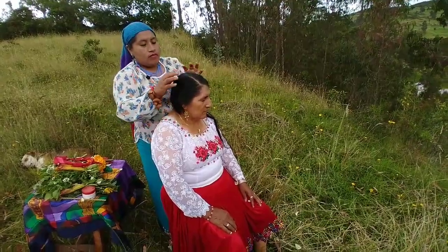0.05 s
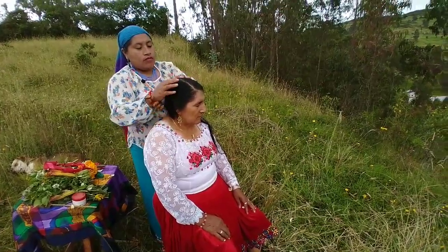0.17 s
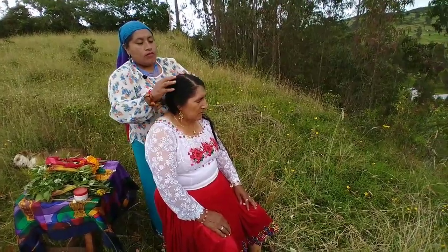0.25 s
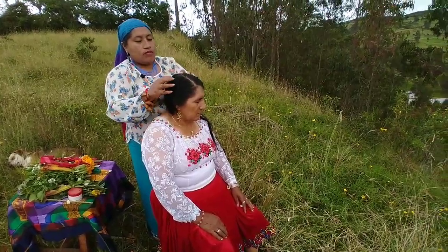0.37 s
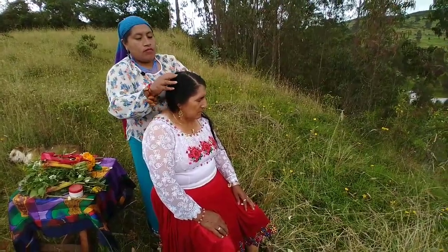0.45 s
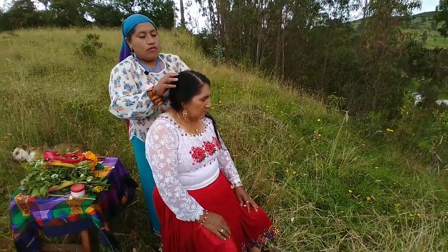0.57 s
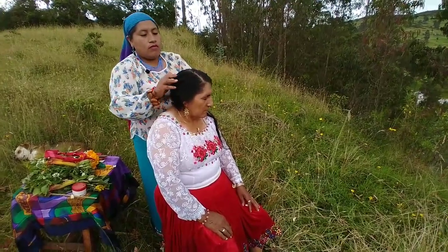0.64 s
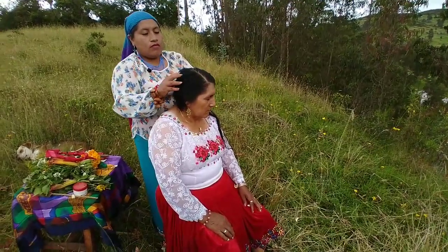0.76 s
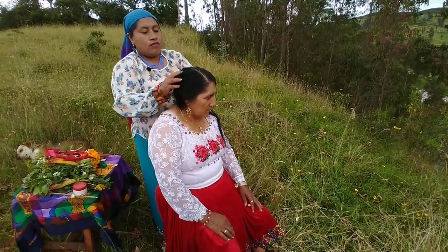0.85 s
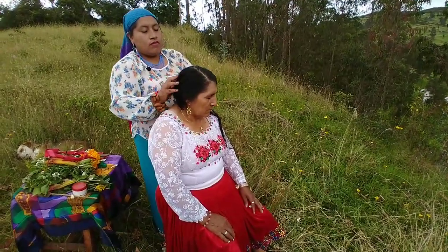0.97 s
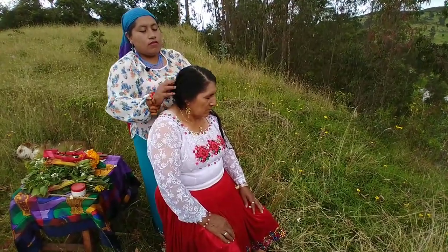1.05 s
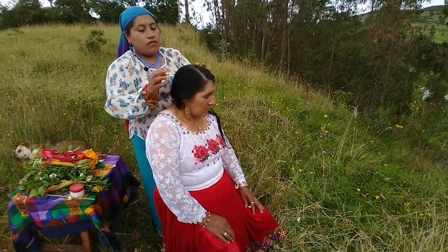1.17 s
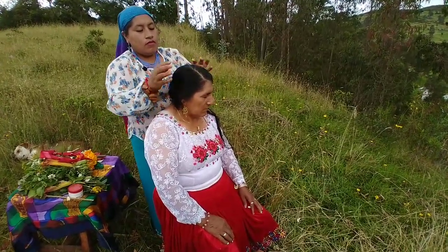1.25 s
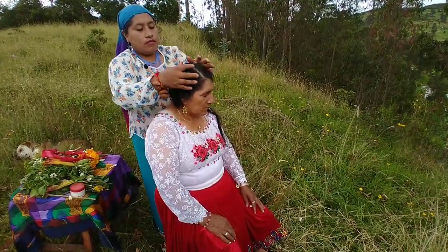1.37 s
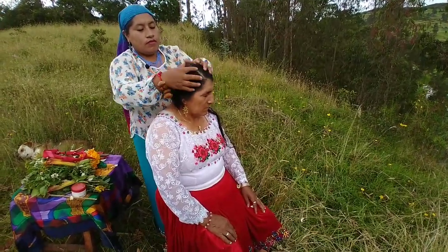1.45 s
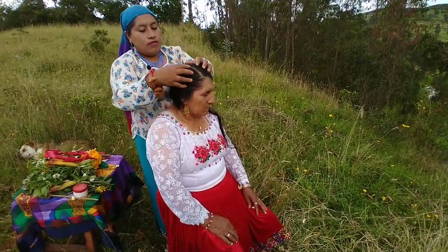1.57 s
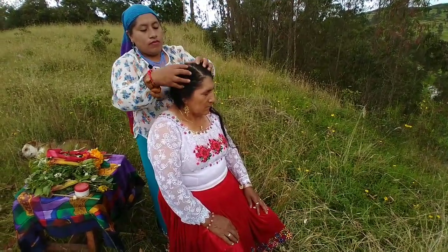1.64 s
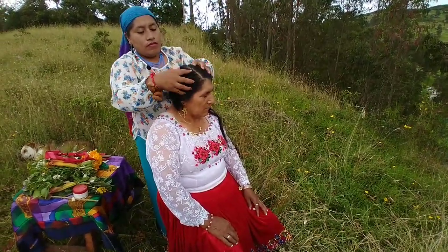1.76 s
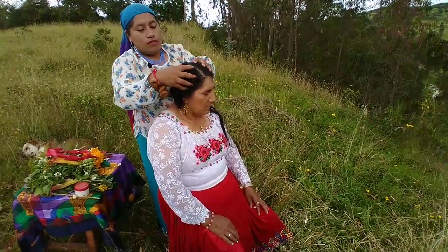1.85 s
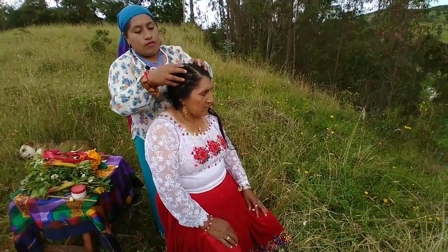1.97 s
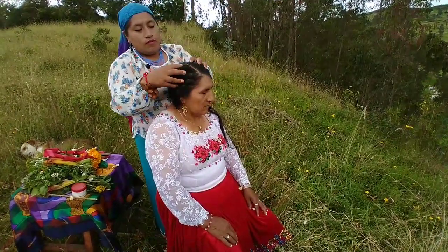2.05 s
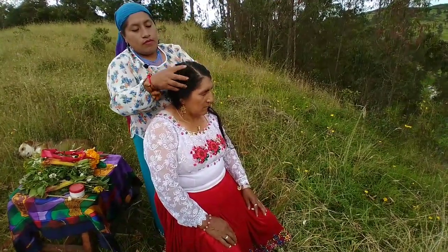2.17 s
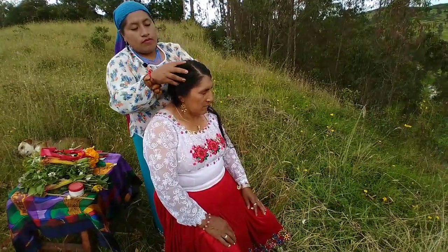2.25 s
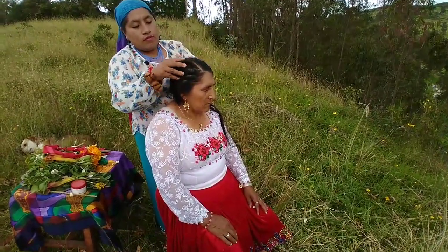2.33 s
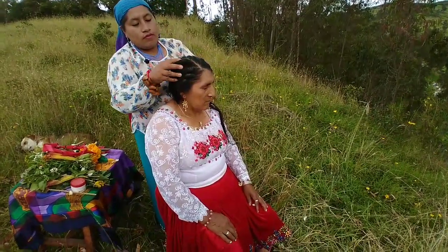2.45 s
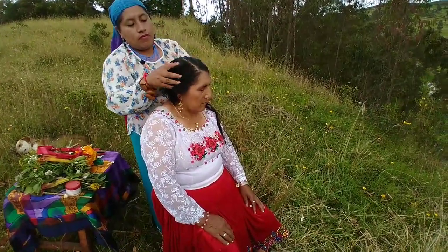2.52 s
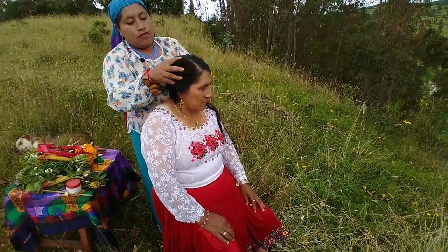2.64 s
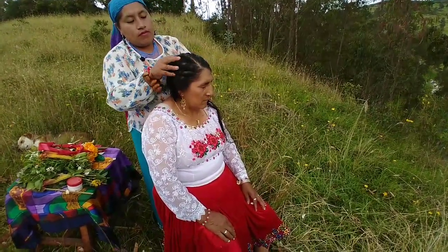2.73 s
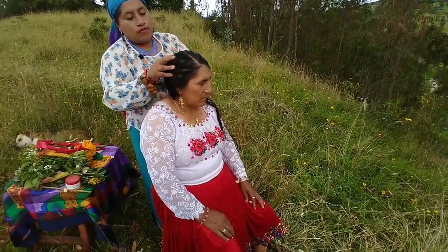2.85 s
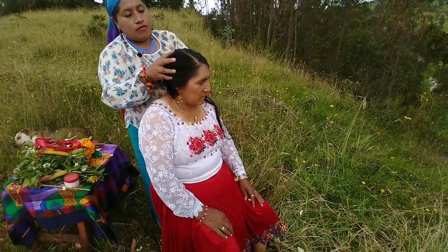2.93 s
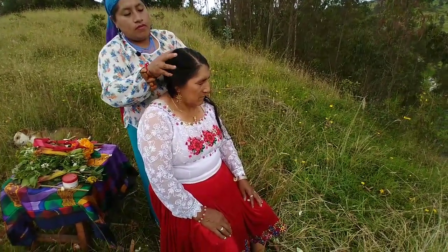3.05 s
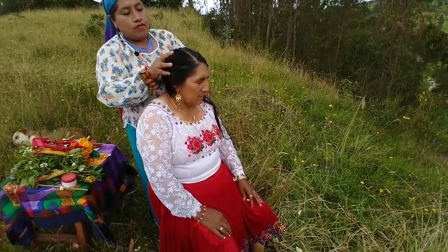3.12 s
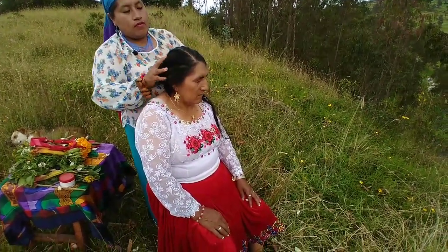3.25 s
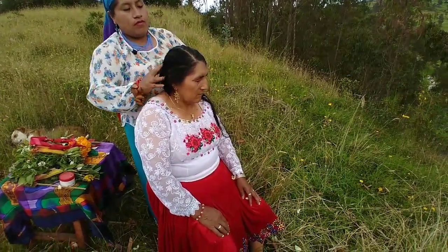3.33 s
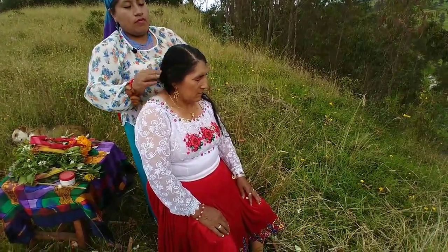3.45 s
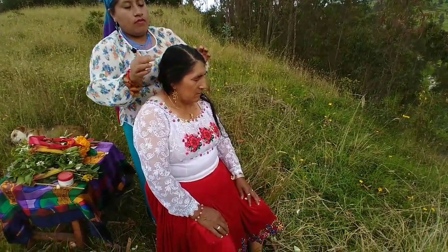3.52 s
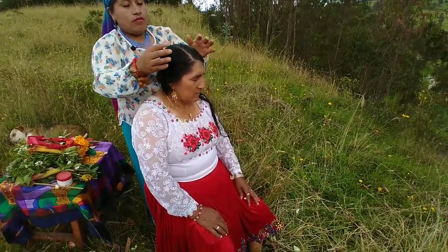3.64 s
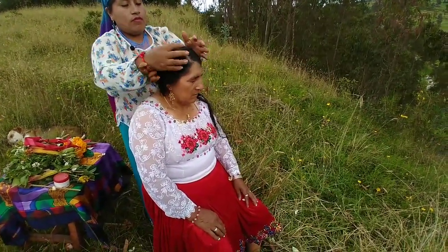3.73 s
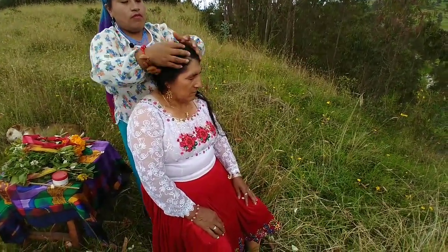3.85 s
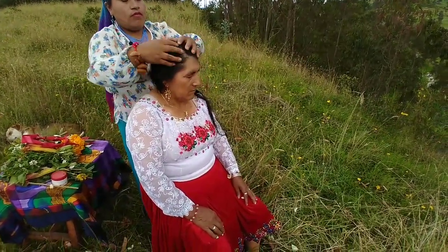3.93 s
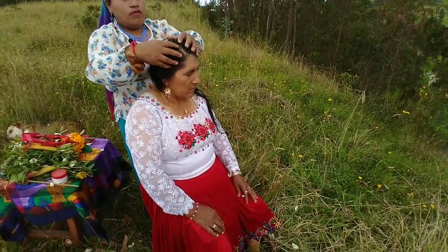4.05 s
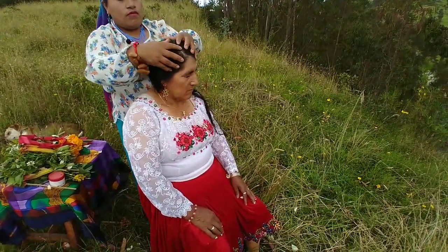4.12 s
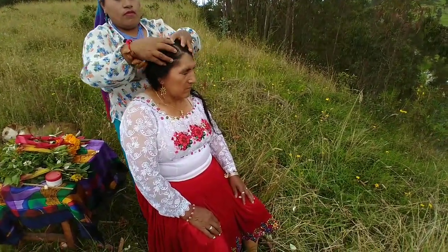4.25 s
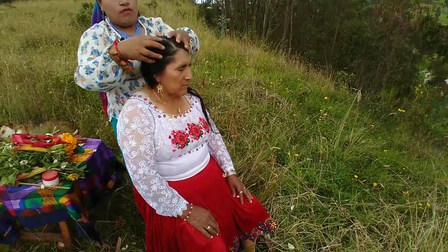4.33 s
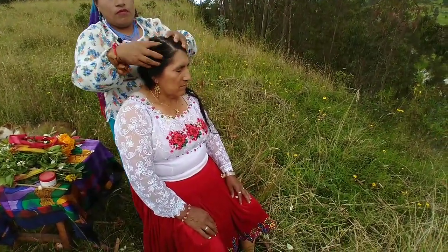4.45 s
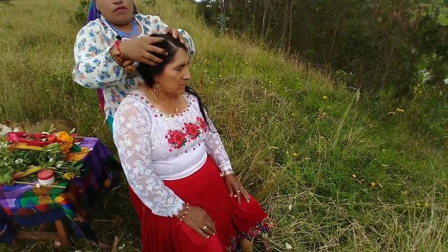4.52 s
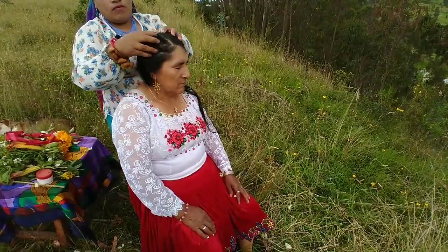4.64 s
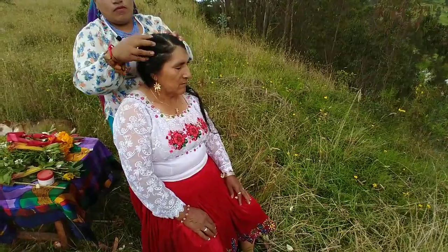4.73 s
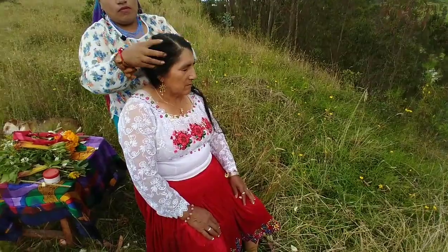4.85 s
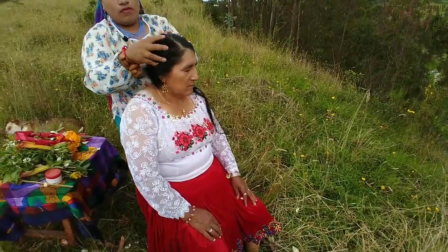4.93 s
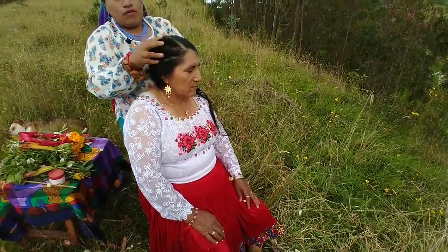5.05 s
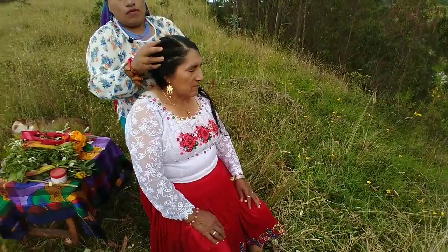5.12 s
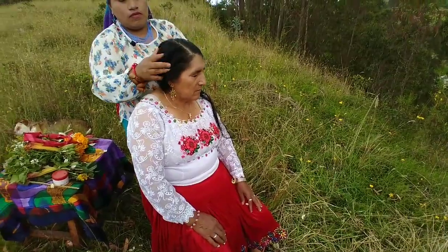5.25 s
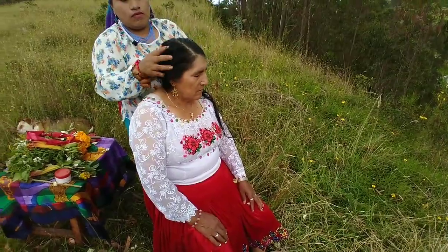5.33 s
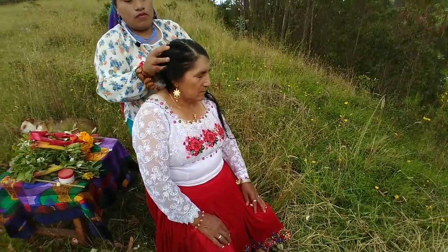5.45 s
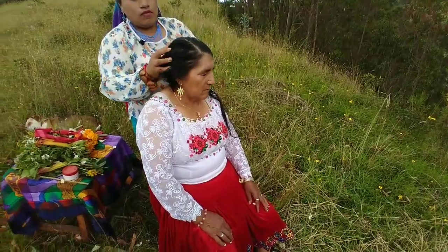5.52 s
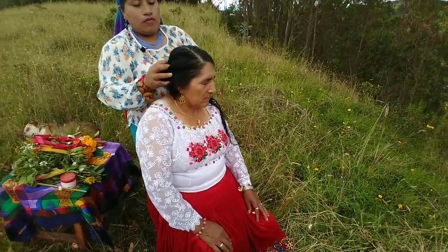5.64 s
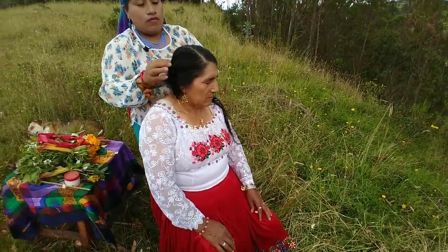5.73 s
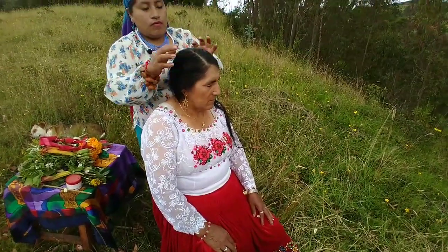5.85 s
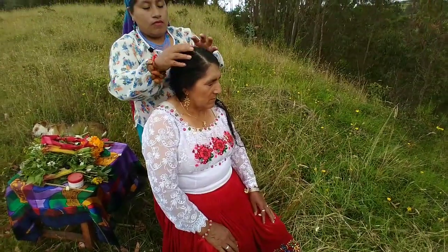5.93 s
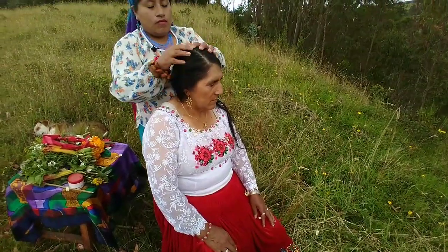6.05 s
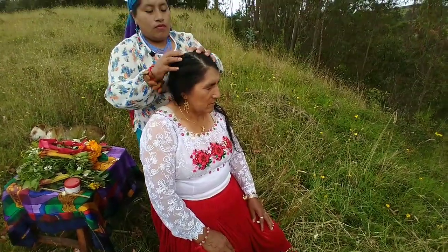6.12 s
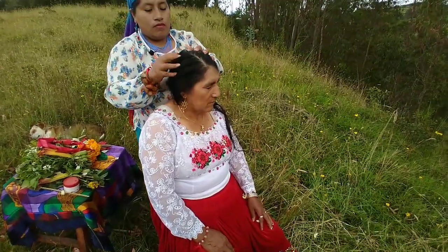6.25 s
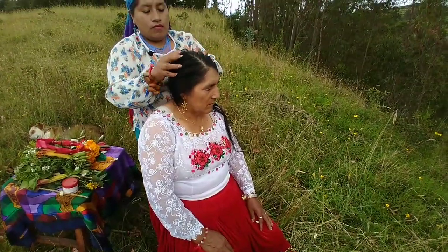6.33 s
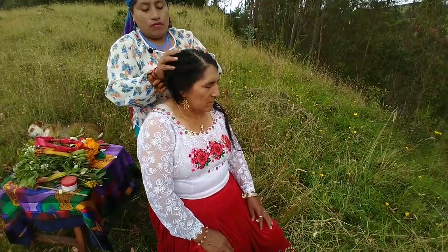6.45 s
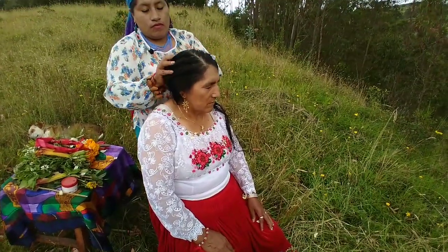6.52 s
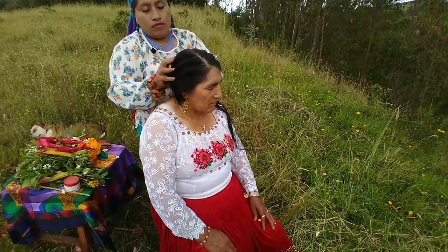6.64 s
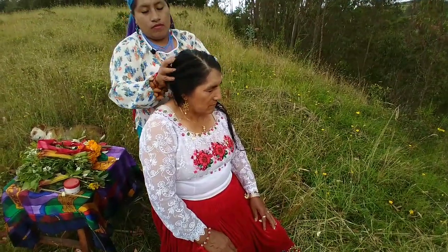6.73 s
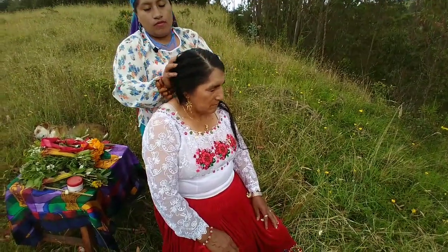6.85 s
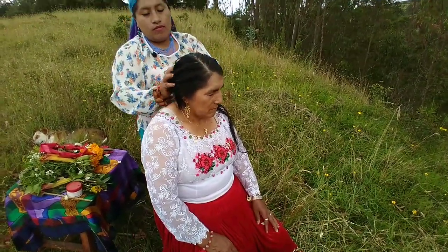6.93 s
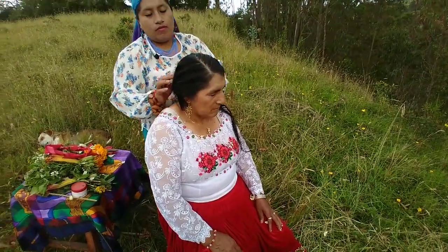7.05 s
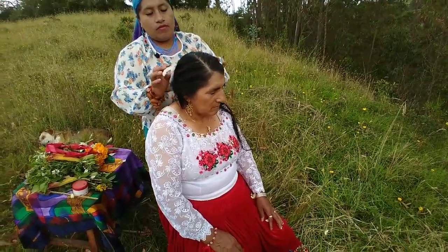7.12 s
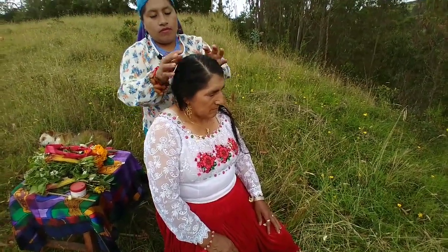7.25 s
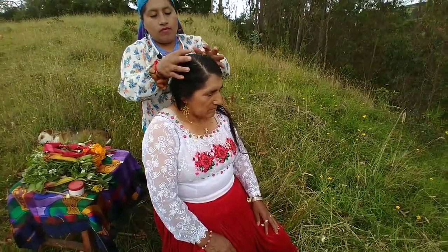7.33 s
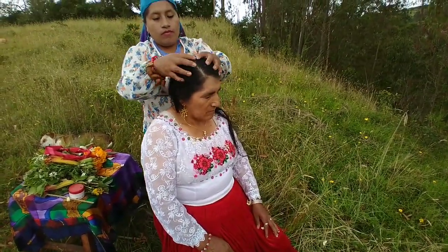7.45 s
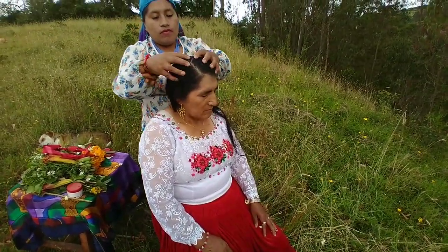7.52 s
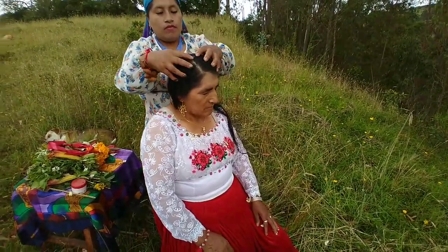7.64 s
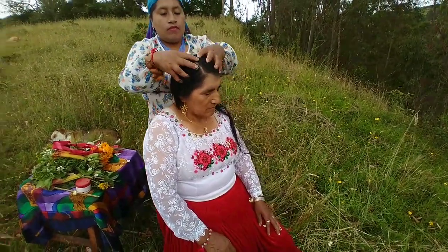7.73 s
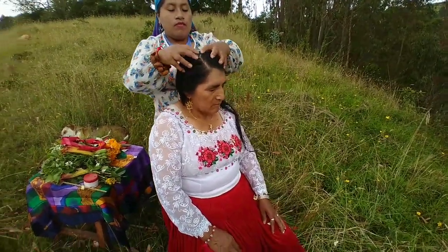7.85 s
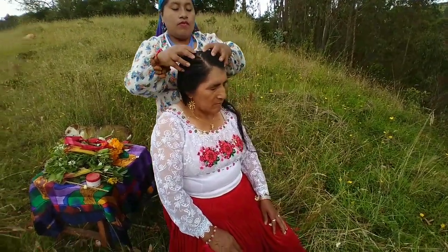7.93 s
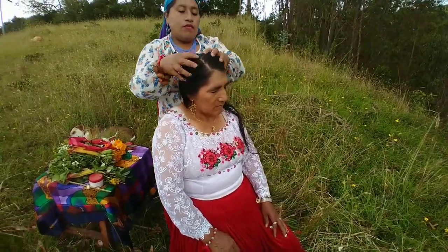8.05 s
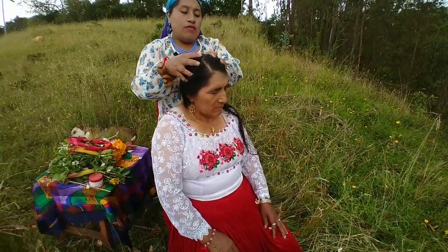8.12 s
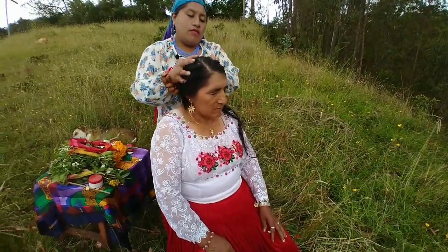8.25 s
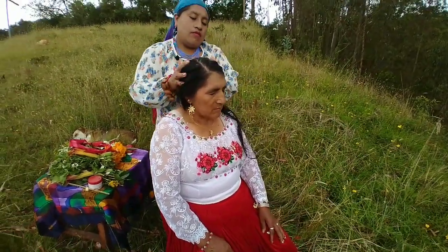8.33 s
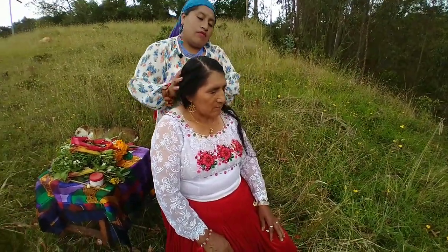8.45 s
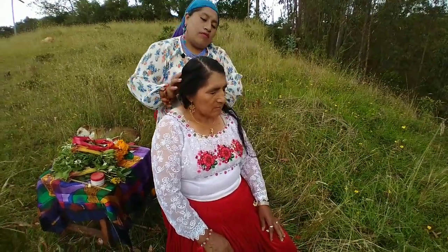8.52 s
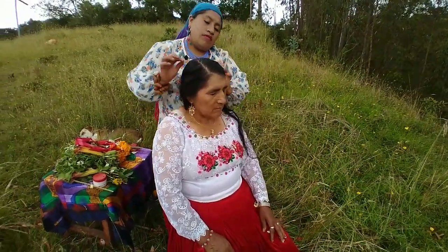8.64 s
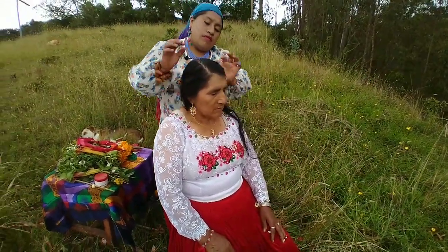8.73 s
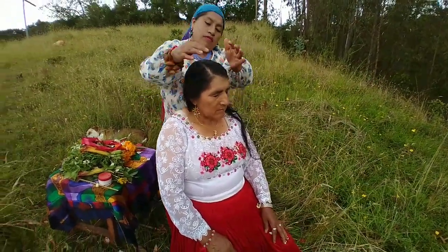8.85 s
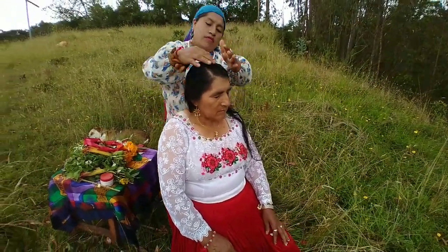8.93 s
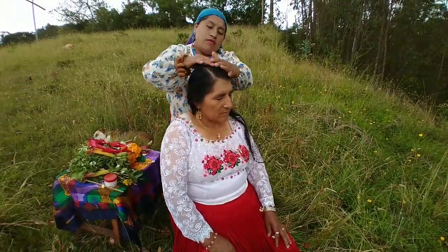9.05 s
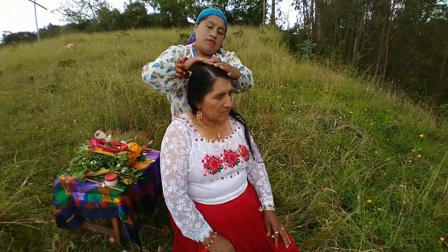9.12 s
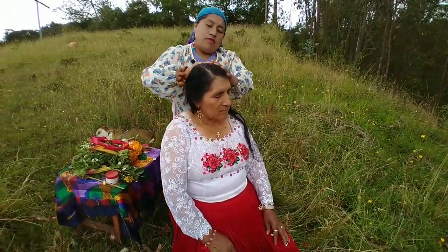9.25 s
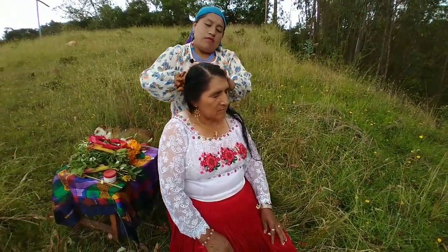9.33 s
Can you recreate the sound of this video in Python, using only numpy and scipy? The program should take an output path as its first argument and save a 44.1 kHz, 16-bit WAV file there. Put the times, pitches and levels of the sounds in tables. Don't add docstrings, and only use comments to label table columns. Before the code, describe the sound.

Close, dry clacking of small hollow beads on moving wrists, clustered with hand strokes on a grassy hillside, with distant traffic rumbling softly below.

```python
import sys
import numpy as np
from scipy import signal
from scipy.fft import rfft, irfft
from scipy.io import wavfile
from scipy.ndimage import map_coordinates

SR = 44100
rng = np.random.default_rng(int(sys.argv[2]) if len(sys.argv) > 2 else 0)


def volts(x):
    e = np.asarray(x, float) / 20
    return 10 ** e


def wav_record(signal):
    frames = np.transpose(np.atleast_2d(signal))
    bounded = np.clip(frames, -1, 1)
    quanta = np.round(bounded * 32767).astype(np.int16)
    wavfile.write(sys.argv[1], SR, quanta)


N = 413658

# [t/s, peak level/dB, hollow ring f/Hz, shell crack re ring/dB]
STRONG_KNOCKS = [(0.24, -10.5, 2700, -21), (0.574, -10, 2800, -15.5), (0.6, -11.5, 2750, -25),
                 (0.708, -3, 2730, -16), (0.735, -12, 2750, -26), (0.785, -4.5, 2740, -12.5),
                 (0.931, -7, 2600, -19), (0.94, -8, 2710, -26), (0.95, -8, 2560, -27),
                 (1.064, -8, 2570, -14.5), (1.076, -5.5, 2580, -17), (2.272, -15.5, 2800, -26),
                 (3.928, -9.5, 2800, -24), (4.247, -16, 2520, -28), (4.258, -19, 2640, -27),
                 (4.385, -8, 2710, -21.5), (4.401, -22, 2800, -32), (5.155, -9.5, 2710, -22),
                 (5.243, -8, 2730, -16.5), (5.809, -8.5, 2920, -21), (5.84, -10.5, 2890, -23),
                 (6.071, -10, 2580, -24), (6.099, -3, 2630, -20), (6.124, -5.5, 2730, -16),
                 (6.142, -18, 2490, -23), (6.417, -19, 2770, -15), (6.465, -10.5, 2540, -11),
                 (6.593, -8, 2800, -25), (6.881, -10, 2700, -25), (6.979, -15, 2660, -29),
                 (7.156, -15, 2750, -13), (7.162, -15, 2850, -26), (7.59, -21, 2770, -33),
                 (7.609, -23, 2770, -27), (7.616, -14, 2930, -17), (7.628, -0.5, 2830, -16.5),
                 (7.642, -7.5, 2880, -28), (7.887, -17, 2620, -38), (7.964, -20, 2800, -21),
                 (8.217, -20, 2750, -40), (8.383, -7, 2590, -30), (8.931, -17.5, 2680, -14),
                 (8.981, -17, 2620, -27), (8.997, -4.5, 2415, -14), (9.038, -21.5, 2450, -1),
                 (9.078, -6.5, 2630, -19), (9.115, -4.5, 2600, -26), (9.139, -6.5, 2710, -17.5),
                 (9.224, -17.5, 2710, -31), (9.259, -9.5, 2550, -27.5),
                 (0.31, -9.5, 2920, -14.5), (0.325, -1, 2730, -13), (0.341, -1.5, 3000, -14),
                (0.357, -0.5, 3050, -20), (0.523, -17, 3030, -15), (0.624, -20, 2860, -24),
                (0.757, -8.5, 3000, -22), (0.764, -10, 3380, -19), (0.797, -6, 3030, -41),
                (0.807, -25, 2950, -32), (0.91, -17.5, 4050, -11.5), (1.5, -16.5, 3860, -30),
                (1.599, -7, 3590, -11.5), (2.071, -2.5, 2940, -18.5), (2.959, -16, 2950, -48),
                (3.539, -12.5, 2740, -22), (3.544, -14, 2940, -21.5), (3.557, -9, 2820, -20.5),
                (3.886, -10, 3020, -25), (4.416, -7.5, 2860, -32), (4.795, -7.5, 2800, -16),
                (5.253, -15, 2860, -17), (5.608, -14.5, 3160, -26), (5.621, -22.5, 2940, -29),
                (6.02, -11.5, 3930, -33), (6.063, -16.5, 3970, -19), (6.084, -11, 3960, -13),
                (6.108, -17, 4060, -27), (6.187, -3, 4030, -12.5), (6.219, -2.5, 2830, -15),
                (6.231, 3.5, 2840, -19), (6.305, -15, 2780, -22), (6.516, -19, 2820, -14),
                (6.631, -17, 2780, -19), (6.637, -4, 3080, -29), (6.644, -2, 2930, -19.5),
                (6.657, -18, 3680, -30), (6.891, -14, 4040, -29), (7.063, -17, 3060, -32),
                (7.068, -8.5, 3130, -35), (7.599, -8.5, 3130, -17), (7.876, -12, 2650, -32),
                (7.982, -8, 2970, -22.5), (8.024, -10, 3060, -13.5), (8.153, -10, 3050, -14),
                (8.957, -15, 3790, -12), (8.968, -7.5, 3940, -12.5), (9.093, -1, 3060, -17.5),
                (9.127, -3.5, 3100, -15.5), (9.148, -8, 2720, -25)]
# [t/s, peak level/dB, hollow ring f/Hz]
MORE_KNOCKS = [(0.018, -19.5, 2710), (0.055, -34, 2050), (0.487, -33, 2060), (1.472, -19.5, 2510),
        (1.642, -19, 2540), (1.763, -31, 2040), (1.952, -16, 2680), (2.285, -23, 2720),
        (2.849, -20, 2710), (2.864, -11.5, 2800), (3.159, -12.5, 2640), (3.315, -14.5, 2690),
        (3.46, -10, 2700), (3.623, -20.5, 2650), (3.648, -28, 2240), (3.835, -37, 2670),
        (3.875, -15.5, 2730), (3.908, -16.5, 2450), (3.938, -33, 2170), (4.34, -27, 2120),
        (4.482, -22, 2050), (4.739, -18, 2680), (4.85, -31, 2600), (5.067, -32, 2630),
        (5.109, -16, 2550), (5.296, -27, 2670), (5.468, -36, 2080), (5.57, -19, 2710),
        (6.041, -19, 2620), (6.569, -22, 2710), (6.786, -18.5, 2730), (7.246, -33, 2580),
        (7.531, -37, 2510), (7.574, -21, 2640), (7.652, -13.5, 2770), (7.717, -24.5, 2640),
        (7.793, -19, 2650), (7.86, -19.5, 2730), (7.974, -28, 2630), (8.249, -34, 2680),
        (8.275, -24, 2540), (8.282, -16, 2500), (8.298, -20, 2590), (8.317, -30, 2750),
        (8.378, -24, 2710), (8.42, -26, 2580), (8.435, -27, 2620), (8.46, -26.5, 2710),
        (8.651, -29, 2730), (8.685, -22.5, 2800), (8.741, -17, 2790), (8.755, -41.5, 2760),
        (8.801, -33, 2550), (8.851, -34.5, 2700), (9.026, -21, 2670), (9.177, -14, 2680),
        (0.176, -32, 2830), (0.21, -27, 2840), (0.221, -31, 2880), (0.567, -23, 2890),
               (0.899, -19, 2650), (1.194, -45, 2780), (1.528, -26, 2750), (1.888, -16, 2900),
               (1.918, -25, 2770), (2.144, -40, 2760), (2.226, -12.5, 2730), (2.505, -25.5, 2700),
               (2.681, -27, 2790), (2.876, -25, 2860), (2.966, -20.5, 2780), (2.986, -32, 2710),
               (3.03, -27.5, 2720), (3.12, -28.5, 2670), (3.225, -23, 2750), (3.271, -24, 2860),
               (3.436, -15, 2870), (3.505, -13.5, 2900), (3.678, -25, 2850), (3.774, -28.5, 2740),
               (3.802, -21, 2770), (4.096, -44, 2770), (4.182, -30.5, 2820), (4.327, -34, 2720),
               (4.613, -23, 2750), (4.654, -30, 2740), (4.678, -17, 2750), (4.965, -29, 2830),
               (5.034, -25, 2820), (5.165, -25, 2800), (5.199, -21, 2800), (5.311, -22.5, 2800),
               (5.395, -38.5, 2730), (5.587, -28, 2770), (5.602, -17, 2900), (6.176, -24, 2880),
               (6.286, -30, 2900), (6.301, -11, 2650), (6.602, -24, 2790), (6.683, -13.5, 2780),
               (6.799, -20, 2800), (7.173, -16, 2800), (7.494, -36, 2750), (8.039, -17, 2770),
               (8.345, -27, 2750), (8.568, -18, 2810), (8.572, -18, 2600), (8.588, -17, 2750),
               (8.593, -24, 2810), (8.766, -26, 2670), (8.821, -32, 2790), (9.242, -18, 2850),
        (0.144, -24.5, 3780), (0.19, -23, 3000), (0.653, -23.5, 2920), (0.751, -17, 3170),
              (0.922, -29, 3800), (1.112, -18.5, 3120), (1.127, -27, 2940), (1.236, -32, 2900),
              (1.426, -21, 3750), (1.585, -21, 3500), (1.7, -14.5, 2980), (1.712, -22, 2960),
              (1.821, -26, 3420), (1.835, -20, 3780), (2.042, -12.5, 3530), (2.197, -26, 2960),
              (2.246, -15.5, 3740), (3.33, -20.5, 2920), (3.336, -17, 3060), (3.467, -17, 2940),
              (3.573, -20, 3030), (3.847, -26, 3890), (3.86, -26, 3800), (4.114, -40, 3680),
              (4.206, -40, 2940), (4.218, -27, 2750), (4.501, -24, 3040), (4.54, -22, 3900),
              (4.564, -27, 2880), (4.591, -16, 3790), (4.929, -28.5, 3830), (5.526, -32, 2920),
              (5.673, -16, 2890), (5.722, -32.5, 3980), (5.885, -39, 2920), (5.918, -29, 2910),
              (6.437, -22, 2960), (6.616, -19, 3420), (6.714, -33, 3240), (6.95, -25.5, 3500),
              (7.023, -29, 3780), (7.229, -23, 3100), (7.241, -19.5, 2950), (7.41, -30, 3080),
              (7.431, -33, 2960), (7.556, -37, 3830), (7.694, -43, 2960), (7.767, -35, 3700),
              (8.122, -29, 3120), (8.13, -27, 3220), (8.14, -22, 3130), (8.777, -33, 3200),
              (8.892, -23.5, 3100), (8.9, -35, 3000), (9.168, -9.5, 3190), (9.213, -20.5, 3290),
        (.262, -9.5, 3950),
    (2.386, -31, 3500),
    (2.437, -21.5, 3530),
    (2.756, -30, 2720),
    (4.128, -24, 3850),
    (4.779, -5, 2820),
    (7.138, -19.5, 4150),
    (8.70, -16, 2280),
]
# [t/s, length/s, fine rattle
# level/dB]
SLIDES = [(0, 0.078, -41), (.193, 0.21, -24), (.517, 0.177, -28.5), (.7, 0.13, -29), (.924, 0.21, -29),
          (1.55, 0.18, -33), (1.781, 0.22, -40.5), (2.034, 0.072, -31.5), (2.18, 0.16, -39.5),
          (2.844, 0.072, -31), (3.152, 0.15, -32.5), (3.454, 0.13, -32), (3.839, 0.079, -36),
          (3.982, 0.16, -41), (4.206, 0.086, -34), (4.48, .14, -32), (4.723, 0.073, -30.5),
          (4.879, 0.056, -33.5), (5.096, 0.18, -34.5), (5.556, 0.162, -41.5), (5.987, .09, -38.5),
          (6.078, 0.2, -21), (6.577, 0.13, -28), (6.876, 0.13, -31), (7.571, .15, -40.5),
          (7.932, .12, -30.5), (8.118, 0.078, -32.5), (8.525, 0.1, -31), (9.017, 0.27, -31.5),
          (0.104, 0.12, -45.5), (0.929, .05, -23.5), (2.36, 0.048, -36), (7.768, .06, -35.5),
          (2.482, 0.021, -37), (2.806, 0.012, -36.5), (2.94, 0.048, -32.5), (3.382, 0.035, -39),
          (3.625, 0.05, -41), (4.32, .033, -42.5), (5.776, .037, -43), (6.413, 0.118, -37),
          (6.685, 0.051, -35), (6.849, .03, -40), (6.994, .05, -37.5), (7.186, 0.092, -37.5),
          (7.44, 0.16, -48), (8.212, 0.033, -41), (8.267, 0.058, -33.5), (8.341, 0.097, -34.5),
          (8.651, 0.026, -39), (8.886, 0.019, -33.5), (9.3, 0.091, -44.5)]
# [t/s, fine rattle level/dB]
FLICKS = [(0.141, -38.5), (0.433, -38), (0.866, -30.5), (1.059, -23.5), (1.404, -34), (2.217, -37),
          (2.658, -39.5), (3.774, -36.5), (4.397, -20), (4.664, -38.5), (5.032, -45), (5.592, -29.5),
          (5.814, -27.5), (5.914, -37), (6.285, -41.5), (6.402, -32.5), (6.46, -22), (6.497, -26),
          (6.761, -39), (7.042, -21.5), (7.132, -23), (7.402, -30.5), (7.6, -20), (7.854, -28.5),
          (8.686, -33), (8.739, -40), (8.928, -32), (8.958, -16.5)]
# [t/s, small beads level/dB, shell brightness/dB]
TURN = [(0, 1, 3), (.3, -0.5, 2.5), (.95, -0.5, -1.5), (1.5, -1, 0), (2.0, -1.5, 1), (2.9, 1.5, -1.5),
        (3.6, -2.5, -2), (4.1, -4.5, -0.5), (4.3, -3.5, 0), (4.55, -4.5, -3), (5.1, -3, 1), (5.55, -4, -1),
        (6.05, -0.5, -1), (6.55, 0, 0.5), (6.95, -3, 0), (7.4, -3, 2.5), (8.05, -2.5, 1.5), (8.5, -4, -1.5)]
# [t/s, lag/ms]
LEFT_LAG = [(0, 0.17), (1, 0.16), (2.9, 0.19), (3.8, 0.19), (4.5, 0.24), (5.1, 0.22), (6, .18), (7.3, 0.16),
            (7.65, 0.19), (8, .16), (9.4, 0.13)]
# [f/Hz, spread/Hz, share]
HOLLOWS = [
    (2327, 272, 0.2),
    (2797, 193, .55),
    (3467, 233, 0.23),
    (4030, 480, .07),
]
# [f/Hz, level/dB, time to fall by 60 dB/s]
SHELL_MODES = [(1616, -10, 0.019), (2050, -10.5, 0.044), (2710, 6.5, 0.0092), (3670, 3.5, 0.0067),
               (4230, 4.5, 0.0029), (5100, -1, 0.0018), (6610, -10, 0.004), (7670, -6, 0.0021),
               (9250, -17, 0.0031)]
# [f/Hz, level per Hz/dB]
RUMBLE_MID = [(5.9, -33), (10, 10), (18, -0.5), (43, -8), (96, -8), (135, -14.5), (407, -23.5), (632, -31),
              (854, -32.5), (1200, -41.5), (1560, -57), (2640, -120)]
# [f/Hz, level per Hz/dB]
RUMBLE_SIDE = [(5.9, -46), (10, 13.5), (20, 0), (54, -9.5), (368, -25.5), (658, -28.5), (699, -33),
               (757, -30.5), (1200, -34.5), (1560, -62.5), (2640, -120)]
# [t/s, f/Hz, level/dB]
ENGINE = [
    (0, 103, -51),
    (2, 101, -53),
    (4, 94, -53),
    (5, 92, -62),
    (9.4, 98, -62),
]
# [t/s, length/s, f/Hz, level/dB, left lead/rad]
HOOTS = [(0, 0.096, 962, -54.5, 1.1), (.36, 0.047, 817, -48, 1.9), (.9, 0.054, 833, -50, 4.3),
         (1.45, 0.24, 159.7, -45.5, 0.1), (2.118, 0.22, 877, -63, .5), (4.105, 0.27, 716, -54.5, 2.1),
         (4.381, 0.56, 705, -60, 2.16), (4.597, 0.23, 882, -65.5, .5), (5.453, 0.12, 710, -60.5, 2.1),
         (6.614, 0.0066, 606, -45, 0.1), (6.884, 0.22, 916, -54.5, 1.9)]
# [f/Hz, left level per Hz/dB, right level per Hz/dB]
HISS = [(1470, 15, 10.5), (2500, 14.5, 8.5), (4400, 10, 9.5), (7440, 9, 5.5), (9800, 3, 3), (15100, 3, 1.5)]

SMALL_ABOVE_HZ = 3570
LARGE_HZ, SMALL_HZ = 2750, 3557


def knocks():
    tap_crack_db = -22.5
    taps = [(*row, tap_crack_db) for row in MORE_KNOCKS]
    strong = [tuple(row) for row in STRONG_KNOCKS]
    return np.transpose(sorted(strong + taps))


def clacks(at_s, peak_db, crack_db, ring_hz):
    luck = rng.random((len(at_s), 6))
    other_hz = np.where(ring_hz < SMALL_ABOVE_HZ, SMALL_HZ, LARGE_HZ)
    ring = beads(at_s, peak_db - 0.5, ring_hz, 0.013, other_hz, -9.0)
    shove_s = at_s + 0.001269 + 0.0031 * luck[:, 0]
    shoved = beads(shove_s, peak_db - 11.0 - 8 * luck[:, 1], ring_hz, 0.03, ring_hz, -2)
    chatter_s = at_s + 0.005 * luck[:, 2:].T * [[0], [1], [1], [1]]
    chatter = shells(chatter_s.ravel(), np.tile(peak_db - 30.5, 4), np.tile(crack_db + 25.5, 4), patchy_db=4.0)
    return ring + shoved + chatter


def rattle(knock_s, knock_db, knock_hz):
    contacts_per_s = 1800
    count = int(contacts_per_s * N / SR)
    at_s = np.sort(rng.uniform(0, N / SR, count))
    size_db = 3.0 * np.minimum(rng.exponential(1, count), 3.0)
    size_db += 3.0 * drift(85)[(at_s * SR).astype(int)]
    size_db += shaking(at_s, knock_s, knock_db)
    bare_db = np.interp(at_s, *np.transpose(TURN)[::2])
    fine = shells(at_s, size_db - 25, bare_db, patchy_db=4.0)
    at_s = at_s[::4]
    hz, spread, share = np.transpose(HOLLOWS)
    kind = np.searchsorted(np.cumsum(share) / share.sum(), rng.random(len(at_s)))
    ring_hz = hz[kind] + spread[kind] * rng.standard_normal(len(at_s))
    ring_hz[::2] += np.interp(at_s[::2], knock_s, knock_hz) - hz[kind[::2]]
    ring_hz = np.maximum(ring_hz, 2000)
    ring_db = favoured(at_s, ring_hz) + size_db[::4] - 7.5
    return fine + beads(at_s, ring_db, ring_hz, 0.012, ring_hz, -2)


def shaking(at_s, knock_s, knock_db):
    flick_s = 0.033
    stir_lead_s, stir_s, stir_db = 0.0023, 0.016, -20
    slides = SLIDES + [(s, flick_s, db) for s, db in FLICKS]
    slides += [(s - stir_lead_s, stir_s, db + stir_db) for s, db in zip(knock_s, knock_db)]
    start, length, level_db = np.transpose(slides)[:, :, None]
    before = np.maximum(start - at_s, 0)
    after = np.maximum(at_s - start - length, 0)
    sliding = np.max(level_db - 5000 * before - 1500 * after, axis=0)
    settling = np.max(level_db - 18.0 - 400 * before - 120 * after, axis=0)
    return np.maximum(np.maximum(sliding, settling), -63)


def favoured(at_s, hz):
    s, small_db, _ = np.transpose(TURN)
    smallness = np.clip(4 * np.log2(hz / SMALL_ABOVE_HZ), -1, 1)
    return np.interp(at_s, s, small_db) * smallness * (hz < 5000)


def beads(at_s, level_db, ring_hz, ring_t60, partner_hz, partner_db):
    luck = rng.standard_normal((len(at_s), 8))
    lag_s = np.interp(at_s, *np.transpose(LEFT_LAG)) / 1000 + 0.000015 * luck[:, 7]
    first_t60 = ring_t60 * np.exp(0.3 * luck[:, 0])
    first = struck(at_s, level_db, ring_hz, first_t60, 0.0004, lag_s, 1.5 * luck[:, 1])
    partner_hz = partner_hz * np.exp(0.05 * luck[:, 2])
    partner_level_db = level_db + partner_db + 2 * luck[:, 3]
    partner_t60 = ring_t60 * np.exp(0.42 * luck[:, 4])
    partner_lag_s = lag_s + 0.00002 * luck[:, 5]
    partner = struck(at_s, partner_level_db, partner_hz, partner_t60, 0.00042, partner_lag_s, 3.5 * luck[:, 6])
    return first + partner


def struck(at_s, level_db, hz, t60, rise_s, lag_s, pan_db, size=448):
    out = np.zeros((2, N))
    start = (at_s * SR).astype(int)
    index = (start[:, None] + np.arange(size)).ravel()
    clock = np.arange(size, dtype=np.float32) / SR
    for side, delay in enumerate([lag_s, 0 * lag_s]):
        wait = delay + at_s - start / SR
        t = np.maximum(clock - wait[:, None], 0).astype(np.float32)
        rise = 1 - np.exp(-(t / rise_s) ** 2)
        decay = np.exp(-np.log(1000) * t / t60[:, None])
        gain = volts(level_db + (1.0 - side) * pan_db)[:, None]
        wave = gain * (rise * decay) * np.sin(2 * np.pi * hz[:, None] * t)
        out[side] = np.bincount(index, wave.ravel(), N + size)[:N]
    return out


def shells(at_s, level_db, tilt_db, patchy_db):
    at = (at_s * SR).astype(int)
    out = np.zeros((2, N))
    for hz, mode_db, t60 in SHELL_MODES:
        luck = rng.standard_normal((len(at), 3))
        strength_db = level_db + mode_db + tilt_db * (hz > 4000) + 3.0 * luck[:, 0]
        strength_db += patchy_db * drift(22)[at] + favoured(at_s, hz)
        uneven_db = 4.87 * luck[:, 1] * hz / 5000
        sign = np.sign(luck[:, 2])
        clicks = [np.bincount(at, volts(strength_db + way * uneven_db) * sign, N) for way in (1, -1)]
        r, w = volts(-60 / (t60 * SR)), 2 * np.pi * hz / SR
        out += signal.lfilter([0, np.sin(w)], [1, -2 * r * np.cos(w), r * r], np.array(clicks) + 1e-18)
    lag_ms = np.interp(np.arange(N) / SR, *np.transpose(LEFT_LAG))
    late = np.arange(N) - lag_ms * SR / 1000
    out[0] = map_coordinates(out[0], [late], order=3)
    soft = signal.sosfilt(signal.butter(1, 9000, fs=SR, output="sos"), out)
    return soft * volts([[-0.5], [0.5]])


def hillside(x):
    dull = signal.lfilter([0.55], [1, -0.45], x)
    out = x.copy()
    for delay_s, echo_db in [(0.0074, -15.5), (0.023, -37)]:
        lag = int(delay_s * SR)
        out[:, lag:] += volts(echo_db) * dull[:, :-lag]
    return out


def valley():
    mid = volts(-37 + 0.21 * drift(4)) * coloured(*np.transpose(RUMBLE_MID))
    side = volts(-37.5 + 0.31 * drift(1.55)) * coloured(*np.transpose(RUMBLE_SIDE))
    rumble = mid + side * [[1], [-1]]
    t = np.arange(N) / SR
    s, hz, level_db = np.transpose(ENGINE)
    phase = 2 * np.pi * np.cumsum(np.interp(t, s, hz) + 2.83 * drift(9)) / SR
    engine = volts(np.interp(t, s, level_db) + 3.5 * drift(5)) * np.sqrt(2) * np.sin(phase)
    roar = signal.sosfilt(signal.butter(2, 230, "high", fs=SR, output="sos"), rumble)
    roar_db = 2.53 * drift(9) + 5.1 * np.exp(-t / 0.84)
    return rumble + engine + roar * (volts(roar_db) - 1)


def hoots():
    out = np.zeros((2, N))
    waver = drift(25)
    for s, length, hz, level_db, lead in HOOTS:
        span = slice(int(s * SR), int((s + length) * SR))
        phase = 2 * np.pi * np.cumsum(hz * (1 + 0.021 * waver[span])) / SR
        swell = np.sin(np.linspace(0, np.pi, len(phase))) ** 0.6
        loudness = volts(level_db - 3 + 5.0 * waver[::-1][span])
        out[:, span] += 2 * swell * loudness * np.sin(phase + [[lead], [0]])
    return out


def hiss():
    hz, *levels = np.transpose([(600, -38, -55.0)] + HISS)
    sides = [coloured(hz, level_db) * volts(level_db[-1]) for level_db in levels]
    return volts(-66.5) * np.array(sides)


def coloured(hz, level_db):
    f = np.fft.rfftfreq(N, 1 / SR) + 1
    gain = volts(np.interp(np.log(f), np.log(hz), level_db))
    return unit(irfft(rfft(rng.standard_normal(N)) * gain, N))


def drift(rate):
    points = rng.standard_normal(900)
    return np.interp(np.arange(N) / SR * rate, np.arange(900), points)


def unit(x):
    return x / np.sqrt(np.mean(x ** 2))


def scene():
    s, peak_db, hz, crack_db = knocks()
    wrists = clacks(s, peak_db, crack_db, hz) + rattle(s, peak_db, hz)
    close = signal.sosfilt(signal.butter(6, 1560, "high", fs=SR, output="sos"), wrists)
    return hillside(close) + valley() + hoots() + hiss()


def band_limit(x):
    return signal.sosfilt(signal.butter(12, 15610, fs=SR, output="sos"), x)


def record(dry):
    cut = signal.sosfilt(signal.cheby2(6, 22, 15800, fs=SR, output="sos"), dry)
    mix = np.clip(cut - 0.0009, -1, 1)
    return band_limit(mix)


dry = scene()
out = record(dry)
wav_record(out)
```